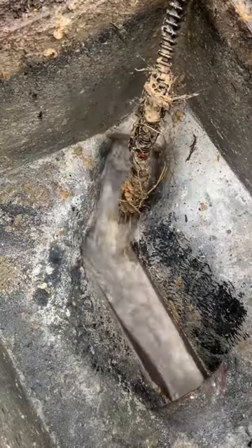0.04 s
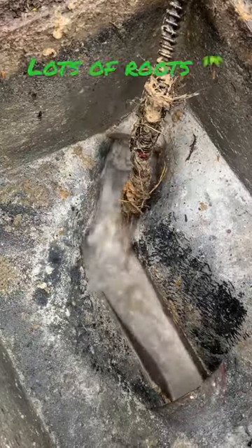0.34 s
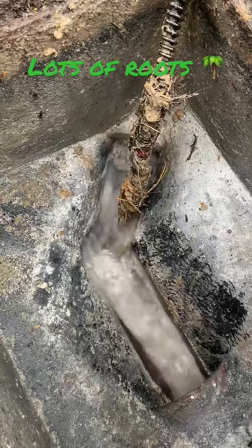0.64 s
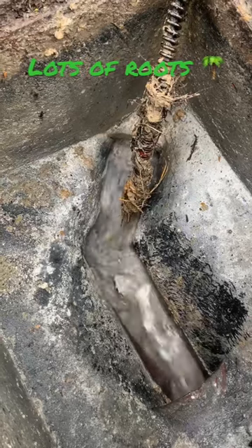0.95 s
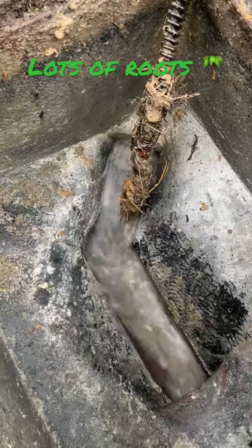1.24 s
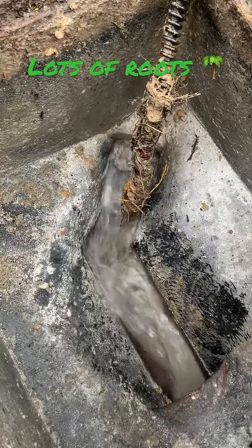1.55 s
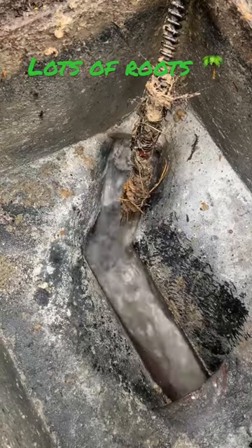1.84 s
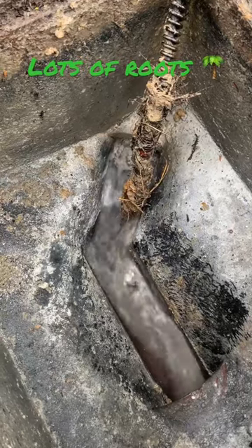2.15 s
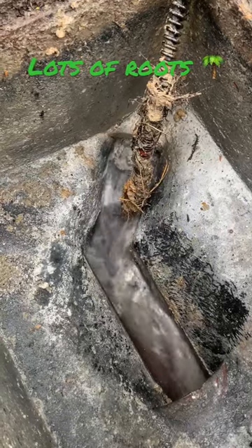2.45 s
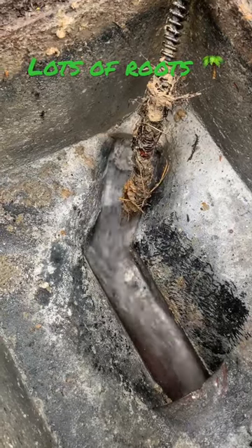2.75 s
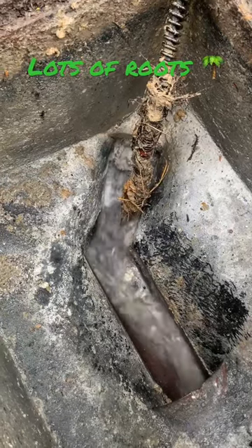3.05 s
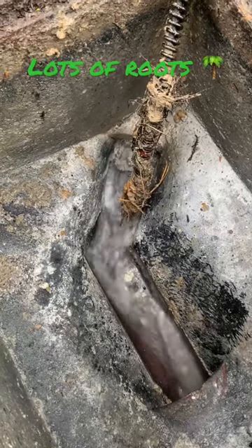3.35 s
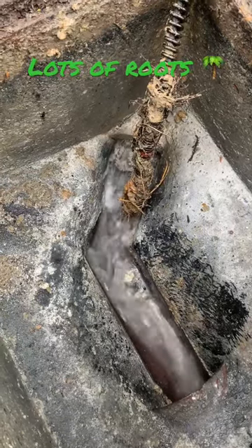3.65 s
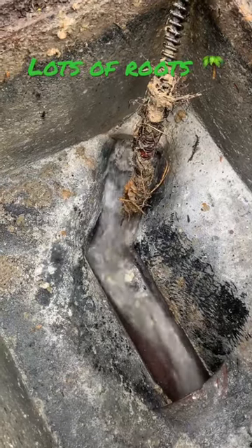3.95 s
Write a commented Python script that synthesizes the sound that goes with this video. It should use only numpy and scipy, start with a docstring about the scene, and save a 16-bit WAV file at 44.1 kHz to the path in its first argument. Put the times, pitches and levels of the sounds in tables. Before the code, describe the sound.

Water rushes and gurgles continuously through a concrete manhole, heard from above with a short, hollow echo. It is loudest in the first 0.7 seconds, with thumping splashes and glugs, then gradually eases until 4 seconds. Bubbles fizz and plip throughout over a low pipe hum that slowly rises in pitch. Droplets tick mostly before 1.5 seconds, and more small splashes and glugs come at about 2 to 2.6 seconds.

```python
"""Concrete manhole: wastewater runs along the channel at the bottom, the flow slowly easing.
The turbulent stream rushes, bursting bubbles fizz, small bubbles chirp upwards as they rise.
The pipe hums on slowly climbing air resonances, rung harder by trapped air glugging in its mouth.
Wavelets slap, slugs of water thump, squeezed air squelches and droplets tick.
The shaft rings with all of it; its walls echo the bubbles, squelches and droplets."""
import sys
import numpy as np
from scipy import signal
from scipy.fft import rfft, irfft
from scipy.io import wavfile

SR = 44100
rng = np.random.default_rng(int(sys.argv[2]) if len(sys.argv) > 2 else 0)


def wav_out(sig):
    """Save sig, one row per channel (or a flat mono array), as 16-bit PCM at SR to the path in sys.argv[1]."""
    wavfile.write(sys.argv[1], SR, np.round(np.clip(np.atleast_2d(sig).T, -1, 1) * 32767).astype(np.int16))


N = 176400
T = np.arange(N) / SR

# start_s, churn_db, gurgle_db, babble_db, spray_db
FLOW_LEVELS = [(0, -24, -37.5, -29.5, -39), (.2, -17, -30, -33, -36), (.42, -22.5, -37, -31.5, -37),
               (.62, -23, -33, -29, -33), (.9, -29.5, -38, -34.5, -35.5), (1.15, -31.5, -38, -34.5, -38.5),
               (1.4, -30, -37, -34.5, -38.5), (1.65, -31.5, -37.5, -36.5, -38),
               (1.92, -27.5, -39.5, -39, -41.5), (2.25, -29.5, -49, -33, -41),
               (2.55, -34.5, -43, -39, -39.5), (2.8, -32, -47, -35, -41), (3.1, -35.5, -40.5, -40, -41.5),
               (3.24, -41.5, -46, -43, -43), (3.5, -34.5, -42, -42, -42), (3.78, -41, -44, -40.5, -43.5),
               (3.88, -42, -56, -41.5, -45.5), (4, -34, -47, -45, -50.5)]

def flow():
    """Stream strength over time: four curves in dB, bass to treble."""
    times_s, *levels_db = np.transpose(FLOW_LEVELS)
    return [np.interp(T, times_s, level_db) for level_db in levels_db]


# freq_hz, density_db
CHURN_SPECTRUM = [(25, -57), (55, 2), (90, -9.5), (140, 4), (200, 4), (280, -5), (380, -3.5), (450, -6.5),
                  (700, -36)]
GURGLE_SPECTRUM = [(300, -9.5), (420, -5), (540, 3), (650, -1.5), (800, -2.5), (1100, -12)]
BABBLE_SPECTRUM = [(500, -9.5), (720, -3.5), (1200, -5), (1400, -11), (2000, -7.5), (3000, -2), (4500, -31)]
SPRAY_SPECTRUM = [(1500, -18.5), (2800, -0.5), (4400, 0.5), (6500, 3), (9000, -3), (11500, 0.5),
                  (13500, -6), (16000, -14)]

def stream(churn_db, gurgle_db, babble_db, spray_db):
    """Turbulent water: churning bass, gurgling and babbling mids, spray on top."""
    churn = from_db(churn_db - 9) * turbulence(CHURN_SPECTRUM, flicker_db=5, surge_db=2, rate_hz=13.7)
    gurgle = from_db(gurgle_db - 3) * turbulence(GURGLE_SPECTRUM, flicker_db=3, surge_db=4.5, rate_hz=44)
    babble = from_db(babble_db - 6) * turbulence(BABBLE_SPECTRUM, flicker_db=4.5, surge_db=3, rate_hz=33)
    spray = from_db(spray_db + 1) * turbulence(SPRAY_SPECTRUM, flicker_db=3, surge_db=3, rate_hz=25.3)
    return churn + gurgle + babble + spray


# start_s, mode1_hz, mode2_hz, mode3_hz
PIPE_PITCHES = [(0, 139.1, 202.9, 281.2), (0.332, 142.8, 206.1, 283), (0.521, 147, 227.5, 305.6),
                (1.15, 154.7, 233.8, 329), (1.65, 155, 239.1, 341.6), (1.999, 156, 246, 354.4),
                (2.4, 157.6, 253.3, 378.7), (3.199, 164.6, 263, 390.2), (4, 171, 270.4, 389.7)]
# Row per mode: width_hz, level_db, churn_share
PIPE_MODES = [(18.5, -36, 0.2), (8.6, -39, 0.76), (27.3, -46, 1.03)]
# start_s, mode1_db, mode2_db, mode3_db
AIR_GLUGS = [(.038, -21, -19, -32), (0.072, -29, -21, -7.5), (.187, -10, -17, -23),
             (0.241, -33, -18, -16.5), (0.574, -26.5, -18, -30), (0.956, -30, -20.5, -32),
             (1.073, -25, -20.5, -40), (1.118, -32, -21, -25.5), (1.962, -36, -53, -28),
             (2.008, -28, -31, -32), (2.138, -16, -33, -30.5), (2.322, -23.5, -22.5, -37.5),
             (2.483, -28, -26.5, -40), (2.602, -15, -23.5, -48), (2.885, -22.5, -32, -52),
             (3.282, -23, -32, -50), (3.322, -23.5, -37, -53), (3.355, -22, -39, -56),
             (3.832, -21.5, -28.5, -46), (3.898, -24, -30.5, -62), (3.948, -21.5, -34, -52)]
# freq_hz, density_db
STIR_SPECTRUM = [(120, 0), (200, -0.5), (500, -11.5)]

def pipe(churn_db, evenness=0.28):
    """Three air modes hum and climb as the flow eases; glugs ring them harder and stir the water."""
    times_s, *pitches_hz = np.transpose(PIPE_PITCHES)
    starts_s, *glugs_db = np.transpose(AIR_GLUGS)
    envelopes = np.array([swell(T - start_s, attack_s=0.008, decay_s=0.042) for start_s in starts_s])
    swing_db = churn_db - churn_db.mean()
    ringing, stir = 0, 0
    for pitch_hz, glug_db, (width_hz, level_db, churn_share) in zip(pitches_hz, glugs_db, PIPE_MODES):
        carrier = np.exp(2j * np.pi * np.cumsum(np.interp(T, times_s, pitch_hz)) / SR)
        wander = drift(width_hz) + 1j * drift(width_hz)
        hum = unit_rms(np.imag(carrier * wander / (np.abs(wander) + 1e-3) ** evenness))
        glugs = from_db(glug_db - 1.5) @ envelopes
        ringing += from_db(level_db + churn_share * swing_db) * hum + glugs * carrier.imag
        stir += glugs
    water = turbulence(STIR_SPECTRUM, flicker_db=2, surge_db=-0.2, rate_hz=42)
    return ringing + from_db(-22) * stir * water


# start_s, slap_db, spray_db, decay_s
WAVELETS = [(0.033, -20, -33, .013), (0.039, -28, -29, 0.0094), (.183, -41, -24.5, 0.0058),
            (.194, -32, -37, 0.042), (.579, -26.5, -31, 0.015), (.717, -41.5, -47, 0.017),
            (1.021, -33.5, -38, 0.028), (1.173, -27.5, -39, 0.0091), (1.3, -49, -33, 0.055),
            (1.396, -36, -32, 0.022), (1.746, -51, -50, 0.007), (2.005, -32.5, -31, 0.032),
            (2.139, -26.5, -27.5, 0.013), (2.152, -28.5, -29.5, 0.022), (2.319, -42, -30, 0.012),
            (2.648, -36.5, -36, 0.013), (2.866, -53, -35, .008)]
# start_s, level_db, decay_s
WATER_SLUGS = [(0.043, -18, 0.02), (0.076, -23, 0.022), (.19, -19, 0.05)]
# freq_hz, density_db
SLAP_SPECTRUM = [(300, -14), (550, 2.5), (900, 4.5), (1300, 0), (1900, -3.5), (3500, -1.5), (5000, -16),
                 (9000, -36)]
SPLASH_SPECTRUM = [(4000, -6), (6500, 0), (11500, -1), (16000, -6)]
THUMP_SPECTRUM = [(25, -19), (58, 17), (130, 15), (330, -3), (600, -6)]

def splashes():
    """Wavelets slap and throw up spray; heavy slugs of water thump in the pipe."""
    slaps, spray, thumps = np.zeros((3, N))
    for start_s, slap_db, spray_db, decay_s in WAVELETS:
        envelope = swell(T - start_s, 0.0013, decay_s)
        slaps += from_db(slap_db) * envelope
        spray += from_db(spray_db) * envelope
    for start_s, level_db, decay_s in WATER_SLUGS:
        thumps += from_db(level_db) * swell(T - start_s, 0.0077, decay_s)
    return (slaps * turbulence(SLAP_SPECTRUM, flicker_db=6, surge_db=1.5, rate_hz=290)
            + spray * turbulence(SPLASH_SPECTRUM, flicker_db=2.5, surge_db=2.5, rate_hz=150)
            + thumps * turbulence(THUMP_SPECTRUM, flicker_db=2, surge_db=0, rate_hz=10))


def bubble(pitch_hz, decay_cycles=8, rise_per_decay=0.035):
    """A bubble rings, its pitch rising as it nears the surface."""
    decay_s = decay_cycles / pitch_hz
    t = T[:int(5 * decay_s * SR)]
    phase = 2 * np.pi * pitch_hz * t * (1 + rise_per_decay * t / decay_s / 2)
    return np.sin(phase) * swell(t, 0.33 * decay_s, decay_s)


# start_s, level_db, pitch_hz
CLEAR_PLIPS = [(0.041, -10.5, 3490), (.08, -6, 370), (0.429, -17, 974), (.675, -17, 770), (1.02, -18, 1635),
               (1.746, -18, 800), (2.005, -20.5, 850), (2.118, -21, 1190), (2.466, -22.5, 1780),
               (2.535, -21, 3700), (2.593, -18, 3540), (3.315, -21.5, 3454), (3.505, -20.5, 3680),
               (3.057, -20, 1584)]

def bubbles(babble_db, per_s=260, low_hz=662, high_hz=4500, spread_db=3.5):
    """Random bubbles, the small ones higher and fainter, plus a few clear plips."""
    out = np.zeros(N)
    for position, smallness, luck in rng.random((int(per_s * N / SR), 3)):
        boost_db = spread_db * min(-np.log(1 - luck), 3)
        level_db = babble_db[int(position * N)] - 9 - 5 * smallness + boost_db
        pitch_hz = low_hz * (high_hz / low_hz) ** smallness
        add(out, position * N / SR, from_db(level_db) * bubble(pitch_hz))
    for start_s, level_db, pitch_hz in CLEAR_PLIPS:
        add(out, start_s, from_db(level_db - 7) * bubble(pitch_hz))
    return out


def fizz(spray_db, per_s=1100, spread_db=2.8, pitch_count=60, width_ratio=0.06):
    """Tiny bubbles burst at the surface, each ringing for a few cycles."""
    strengths = from_db(spread_db * np.minimum(rng.exponential(1, N), 5)) * rng.choice([-1, 1], N)
    bursts = strengths * (rng.random(N) < per_s / SR)
    pitch_index = rng.integers(0, pitch_count, N)
    out = np.zeros(N)
    for k, pitch_hz in enumerate(np.geomspace(2800, 14500, pitch_count)):
        ringing = resonance(bursts * (pitch_index == k), pitch_hz, pitch_hz * width_ratio)
        out += from_db(at_hz(SPRAY_SPECTRUM, pitch_hz)) * ringing
    return from_db(spray_db - 4) * unit_rms(out)


# start_s, level_db, start_hz
AIR_SQUELCHES = [(1.245, -28, 1270), (1.625, -27, 1386), (1.775, -32, 1114), (1.882, -33, 1200),
                 (1.905, -24.5, 571), (1.935, -24, 756), (1.944, -28, 1450), (2.234, -24.5, 1253),
                 (3.182, -33, 1550), (3.417, -26, 1400), (3.5, -34, 1820), (3.89, -34, 1460)]

def squelches(length_s=0.021, octaves_per_s=42, roughness=0.7, flutter_hz=220):
    """Air squeezed out at the surface: short, fluttering upward sweeps."""
    out, t = np.zeros(N), T[:int(length_s * SR)]
    flutter = 1 - roughness / 2 + roughness * (drift(flutter_hz) + 1j * drift(flutter_hz))
    envelope = np.sin(np.pi * (t / length_s) ** 0.37)
    for start_s, level_db, start_hz in AIR_SQUELCHES:
        phase = 2 * np.pi * np.cumsum(start_hz * 2 ** (octaves_per_s * t)) / SR
        sweep = np.imag(np.exp(1j * phase) * flutter[int(start_s * SR):][:len(t)])
        add(out, start_s, from_db(level_db - 5.5) * unit_rms(sweep) / np.sqrt(2) * envelope)
    return out


# start_s, level_db, pitch_hz
DROPLET_TICKS = [(.1485, -14.5, 7400), (0.1834, -19, 11800), (.284, -27, 4800), (0.505, -17.5, 6460),
                 (0.717, -22, 11500), (.879, -18.5, 6820), (1.018, -13, 11700), (1.021, -16, 11200),
                 (1.1825, -20, 6200), (1.187, -12, 8700), (1.3, -26, 14000), (1.3968, -21, 11200),
                 (1.4625, -19, 13900), (2.866, -23, 7530), (3.2593, -22, 10100)]

def droplets():
    """Droplets land with a very short, bright crack."""
    out, t = np.zeros(N), T[:SR // 20]
    envelope = swell(t, attack_s=0.00031, decay_s=0.0009)
    for start_s, level_db, pitch_hz in DROPLET_TICKS:
        crack = unit_rms(resonance(rng.standard_normal(len(t)), pitch_hz, width_hz=4200))
        add(out, start_s, from_db(level_db + 1) * crack * envelope)
    return out


# freq_hz, width_hz, gain_db
SHAFT_BANDS = [(100, 16, 1), (360, 14, 3), (386, 14, 3), (456, 30, -7), (508, 18, 6), (552, 50, 8),
               (635, 25, -5), (794, 90, -4.5), (855, 16, 5.5), (897, 60, -12), (974, 30, 6.5),
               (1192, 30, 6), (1238, 30, 4), (1351, 100, -10), (1768, 35, 7), (2195, 45, 2), (3176, 40, 6),
               (3710, 80, 4)]

def shaft(x):
    """The hollow shaft lifts and prolongs its resonances; a few bands dip."""
    for freq_hz, width_hz, gain_db in SHAFT_BANDS:
        x = x + (from_db(gain_db) - 1) * resonance(x, freq_hz, width_hz)
    return x


def wall_echoes(x, wet_db, t60_s=0.25):
    """Direct sound plus dense reflections between the concrete walls."""
    t = T[:SR // 2]
    tails = rng.standard_normal((2, len(t))) * swell(t, 0.0047, t60_s / np.log(1000))
    tails /= np.sqrt(np.sum(tails ** 2) / 2)
    wet = signal.fftconvolve(x[None], tails, axes=1)[:, :N]
    return x + from_db(wet_db) * widen(*wet)


def turbulence(spectrum, flicker_db, surge_db, rate_hz):
    """Half-octave noise bands that surge together and flicker separately; stereo, rms 1."""
    mid_side, surge = np.zeros((2, N)), drift(rate_hz)
    edges_hz = 22 * 2 ** np.arange(0, 9.9, 0.5)
    white = rng.standard_normal((2, 2, N))
    for k, (low_hz, high_hz) in enumerate(zip(edges_hz, edges_hz[1:])):
        flicker = drift(rate_hz)
        if high_hz > spectrum[0][0] and low_hz < spectrum[-1][0]:
            bandpass = signal.butter(2, [low_hz, high_hz], "band", fs=SR, output="sos")
            band_db = at_hz(spectrum, np.sqrt(low_hz * high_hz)) + surge_db * surge + flicker_db * flicker
            mid_side += from_db(band_db) * signal.sosfilt(bandpass, white[k % 2])
    return unit_rms(widen(*mid_side))


# freq_hz, coherence
STEREO_COHERENCE = [(100, .997), (500, .97), (1200, .92), (2300, .55), (3500, .85), (7000, .86),
                    (15000, .82)]

def widen(mid, side):
    """Two unrelated signals become a stereo pair, alike in the bass, less so above."""
    coherence = np.clip(at_hz(STEREO_COHERENCE, np.arange(N // 2 + 1) * SR / N), 0, 1)
    common = np.sqrt((1 + coherence) / 2) * rfft(mid)
    opposed = np.sqrt((1 - coherence) / 2) * rfft(side)
    return irfft([common + opposed, common - opposed], N)


def drift(rate_hz, hop=40, settle_steps=2000):
    """Smooth random wander, rms about 1."""
    pole = np.exp(-2 * np.pi * rate_hz * hop / SR)
    white = rng.standard_normal(N // hop + settle_steps + 2)
    slow = signal.lfilter([1], [1, -2 * pole, pole ** 2], white)[settle_steps:]
    return np.interp(np.arange(N) / hop, np.arange(len(slow)), unit_rms(slow))


def resonance(x, freq_hz, width_hz):
    """Two-pole resonator, peak gain 1."""
    radius = np.exp(-np.pi * width_hz / SR)
    feedback = [1, -2 * radius * np.cos(2 * np.pi * freq_hz / SR), radius ** 2]
    return signal.lfilter(np.array([1, 0, -1]) * (1 - radius ** 2) / 2, feedback, x + 1e-18)


def swell(t, attack_s, decay_s):
    """Smooth rise, exponential fall."""
    rise = np.sin(np.pi / 2 * np.clip(t / attack_s, 0, 1)) ** 2
    return rise * np.exp(-np.maximum(t - attack_s, 0) / decay_s)


def add(out, start_s, sound):
    """Mix a sound in at start_s."""
    i = int(np.clip(start_s * SR, 0, N - 1))
    out[i:i + len(sound)] += sound[:N - i]


def at_hz(table, freq_hz):
    """Interpolate on a log-frequency axis."""
    knots_hz, values = np.transpose(table)
    return np.interp(np.log(freq_hz + 1e-9), np.log(knots_hz), values)


def from_db(db):
    """Decibels to gain."""
    return 10 ** (np.asarray(db) / 20)


def unit_rms(x):
    """Scale to rms 1."""
    return x / np.sqrt(np.mean(x ** 2) + 1e-20)


def scene():
    """The stream and its events, heard from the top of the shaft."""
    churn_db, gurgle_db, babble_db, spray_db = flow()
    rush = stream(churn_db, gurgle_db, babble_db, spray_db)
    bubbling = fizz(spray_db) + bubbles(babble_db) + squelches()
    water = rush + pipe(churn_db) + splashes()
    return shaft(water + wall_echoes(bubbling, wet_db=-7) + wall_echoes(droplets(), wet_db=-21.5))


# freq_hz, left_lead_rad
PORT_PHASE = [(0, 0), (280, -.25), (500, -.95), (780, 0), (1400, 0), (1600, .7), (2100, .9), (2600, 2.8),
              (3300, 1.3), (4650, 3.1), (15500, 18.9)]

def record(dry, low_cut_hz=50, stopband_hz=16700):
    """Sound reaches two microphone ports at slightly different times; deep bass and top are cut."""
    lead_rad = np.interp(np.arange(N + 1) * SR / (2 * N), *np.transpose(PORT_PHASE))
    shift = np.exp(0.5j * np.array([lead_rad, -lead_rad]))
    ports = irfft(rfft(dry, 2 * N) * shift)[:, :N]
    ports = signal.sosfilt(signal.butter(2, low_cut_hz, "high", fs=SR, output="sos"), ports)
    return signal.sosfilt(signal.cheby2(16, 70, stopband_hz, fs=SR, output="sos"), ports)


dry = scene()
out = record(dry)
wav_out(out)
```